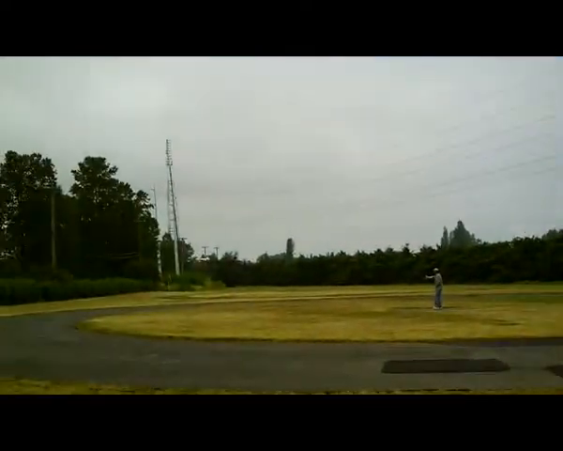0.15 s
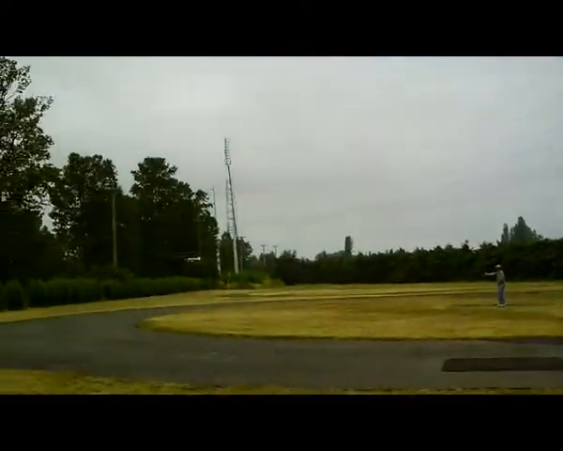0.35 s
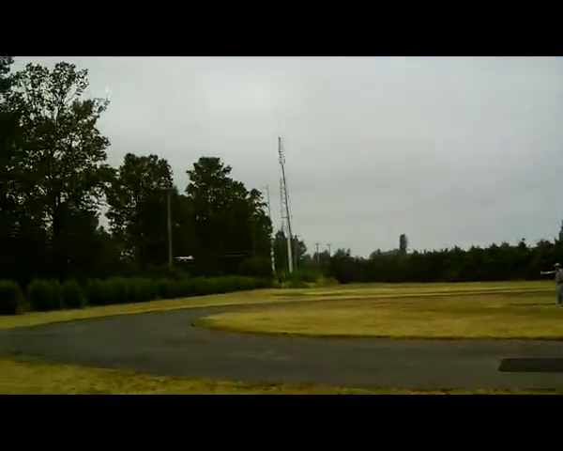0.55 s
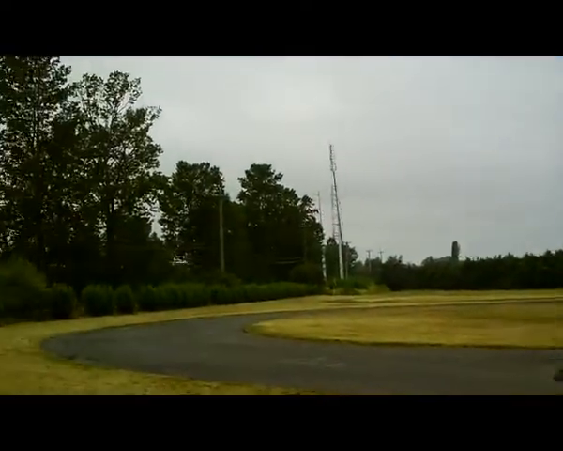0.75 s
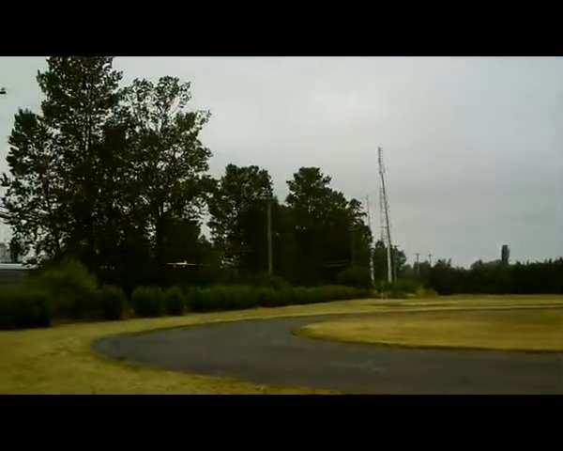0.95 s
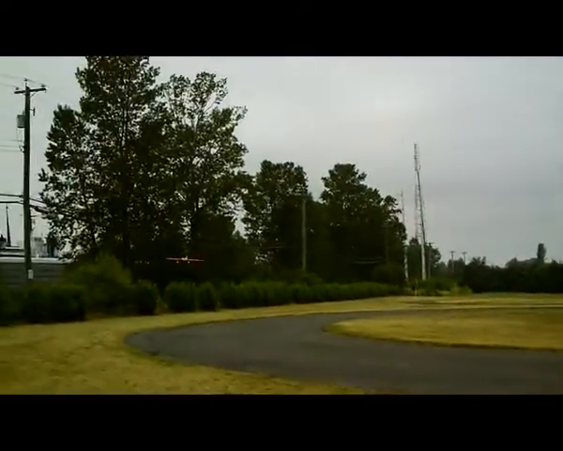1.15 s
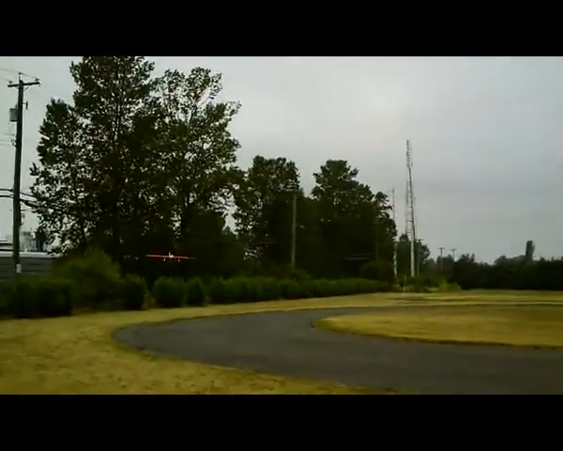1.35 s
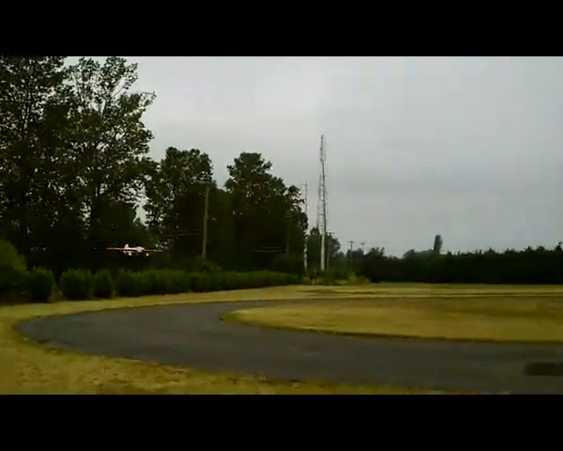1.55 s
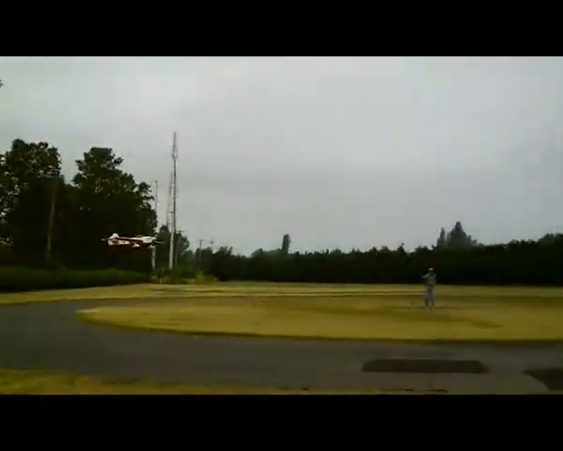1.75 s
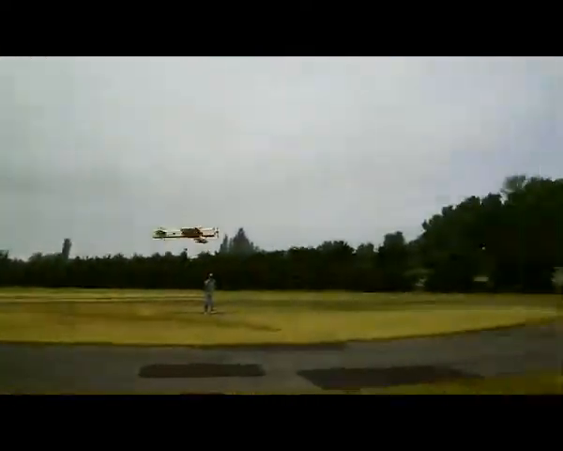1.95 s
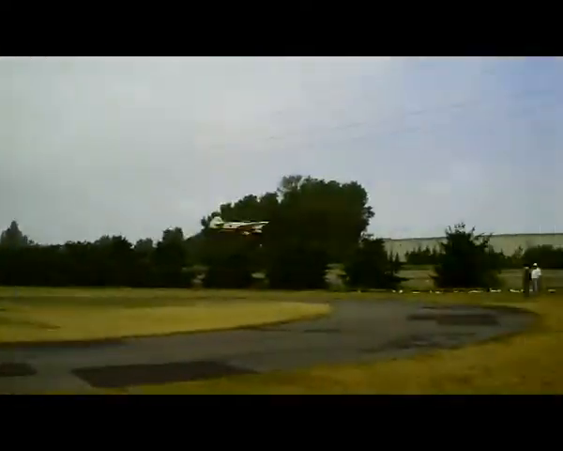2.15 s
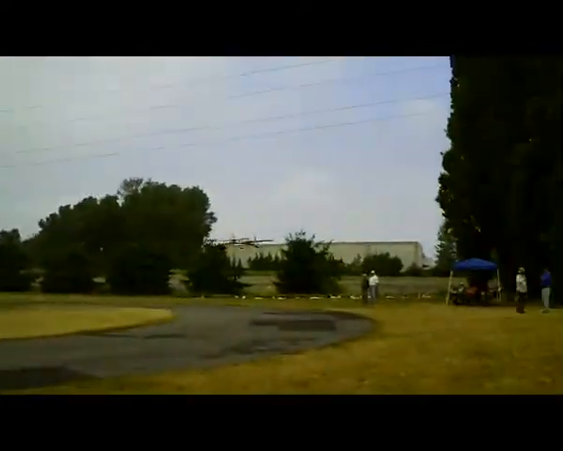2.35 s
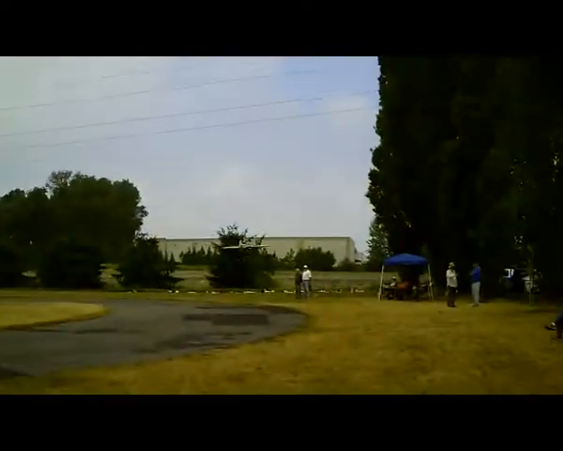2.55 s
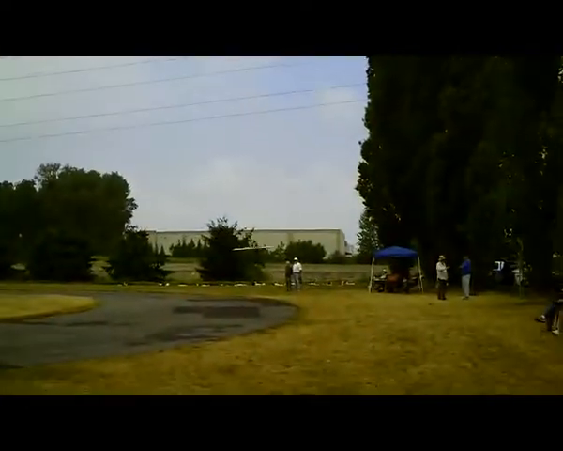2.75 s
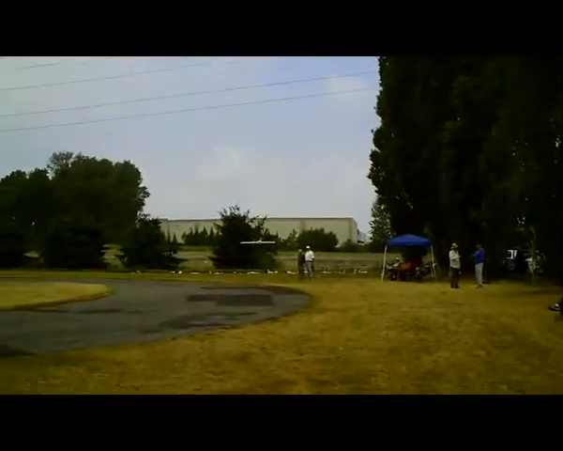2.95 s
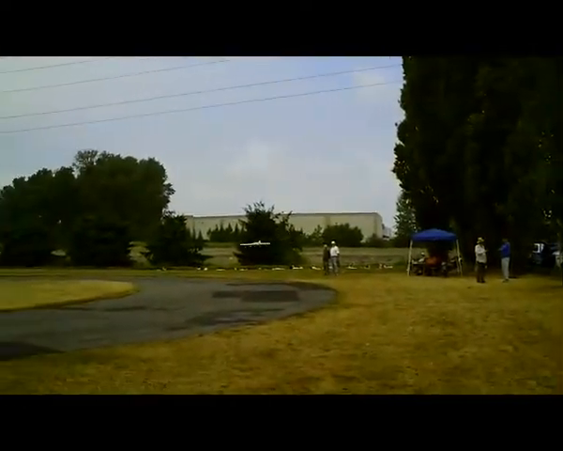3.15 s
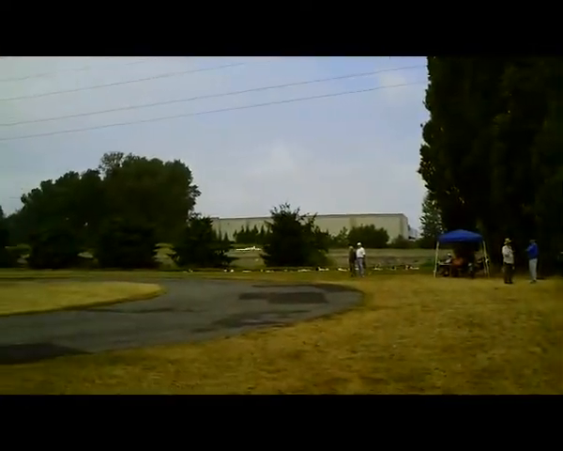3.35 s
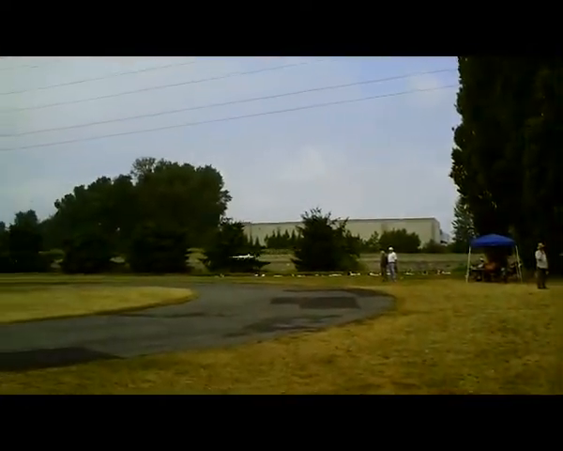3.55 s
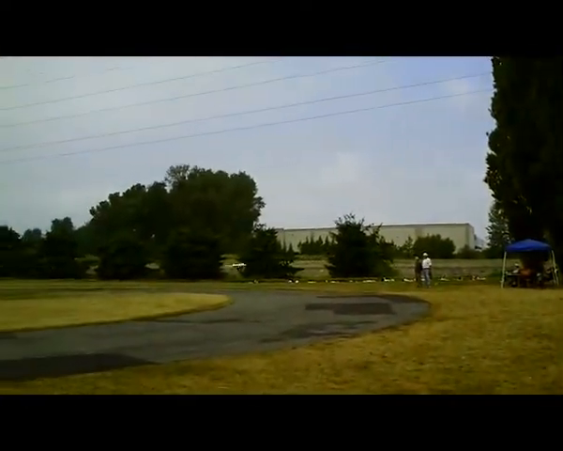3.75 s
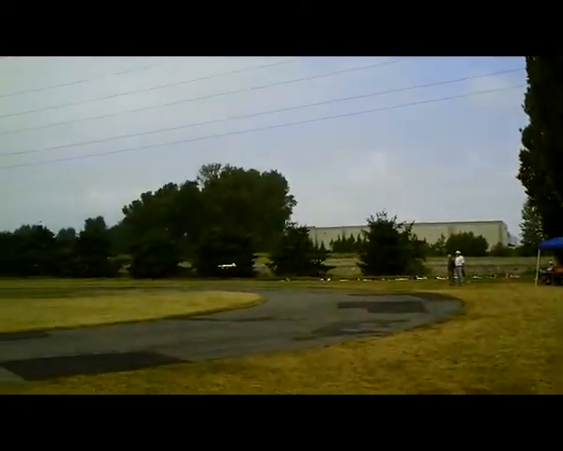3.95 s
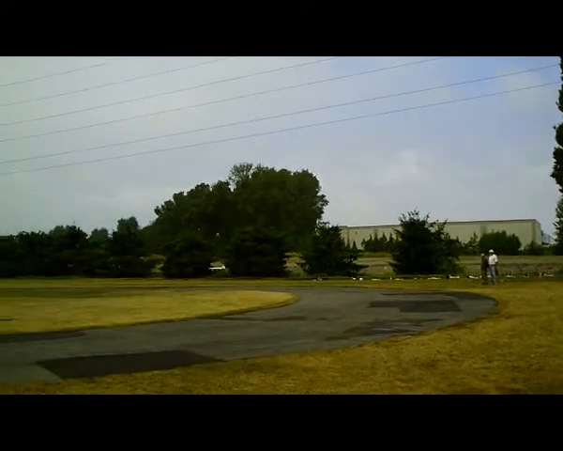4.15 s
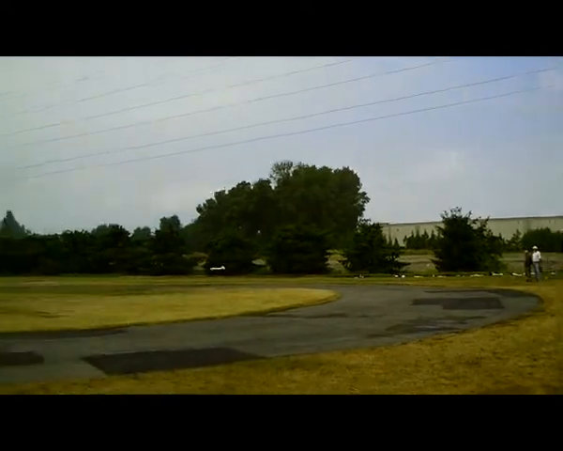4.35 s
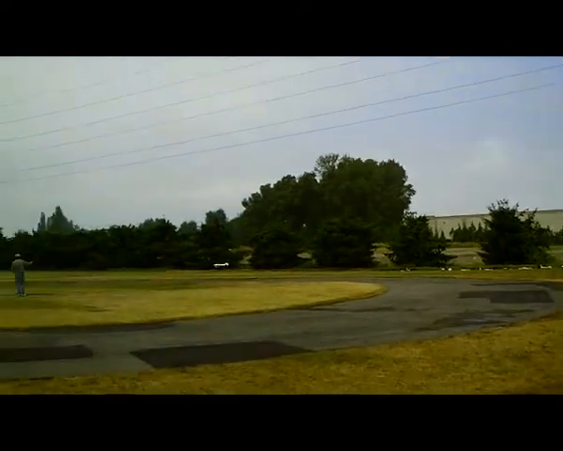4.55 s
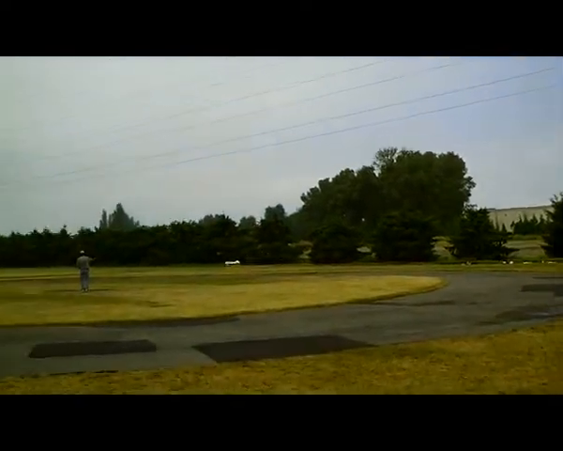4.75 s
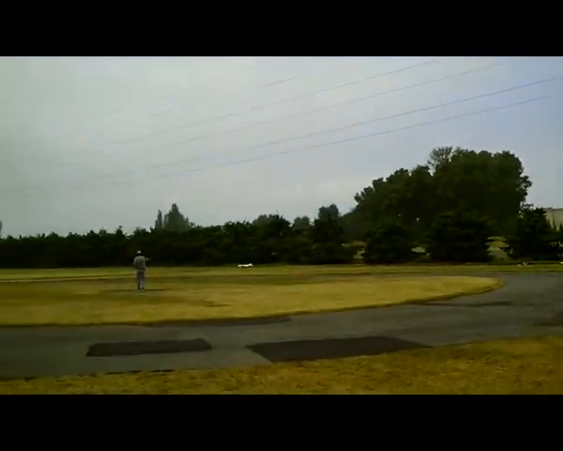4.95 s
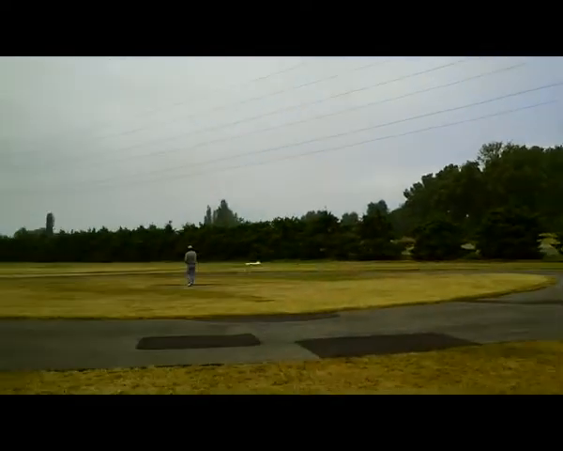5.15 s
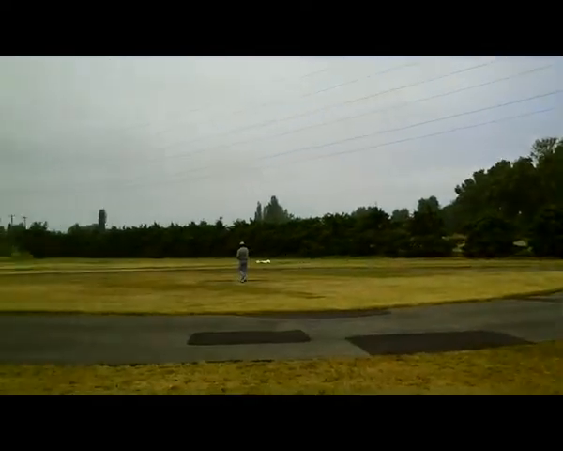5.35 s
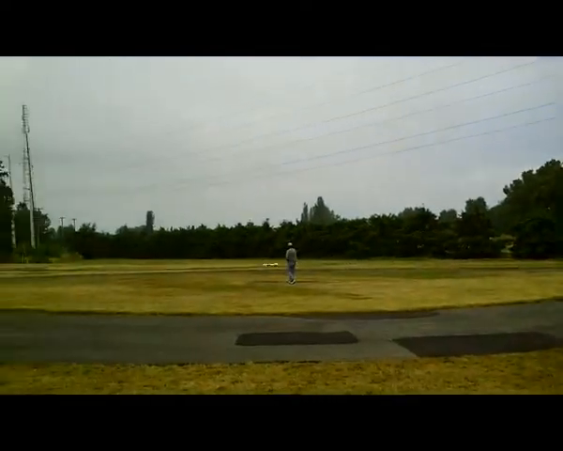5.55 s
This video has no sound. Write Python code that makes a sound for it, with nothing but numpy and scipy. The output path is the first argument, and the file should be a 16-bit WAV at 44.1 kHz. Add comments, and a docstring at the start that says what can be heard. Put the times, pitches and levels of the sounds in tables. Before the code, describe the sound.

A small model plane engine approaches with a raspy, hissing buzz that grows louder. As it passes close by, the pitch drops and the engine throttles back, slowing to a rough putter and then a faint, distant ticking idle. Low wind rumbles on the microphone over an open field, with far traffic murmuring behind. A small bird gives a few thin, high chirps toward the end.

```python
"""A grass field: a control-line model plane flies past, throttles back and sinks to a far, ticking idle. Each
firing of its small glow engine rings the muffler and lets out a puff of hiss. The tree line throws the buzz
back; the ground reflects the crank hum, pops and hiss. Wind rumbles on the microphone, distant traffic murmurs
and a small bird chirps."""
import sys
import numpy as np
from scipy import signal
from scipy.fft import rfft, irfft
from scipy.io import wavfile
from scipy.ndimage import uniform_filter1d

SR = 44100
rng = np.random.default_rng(int(sys.argv[2]) if len(sys.argv) > 2 else 0)


def waveform_to_disk(signal):
    """Save audio, clipped to [-1, 1], as 16-bit WAV at the path in sys.argv[1]."""
    frames = np.transpose(np.atleast_2d(signal))
    scaled = np.clip(frames, -1, 1) * 32767
    samples = np.round(scaled).astype(np.int16)
    wavfile.write(sys.argv[1], SR, samples)


N = 246959
TIME = np.arange(N) / SR
PASS_S, PASS_M, SPEED_M_PER_S = 1.872, 8.59, 25.2  # closest approach


def from_db(db):
    """Decibels to gain."""
    return 10 ** (np.asarray(db) / 20)


def rms_one(x):
    """Scale to unit rms."""
    return x / np.sqrt(np.mean(x ** 2) + 1e-20)


def even(x):
    """Hold rms at 1 over a few firings."""
    power = uniform_filter1d(uniform_filter1d(x ** 2, size=2600), size=2600)
    return x / np.sqrt(np.abs(power) + 1e-12)


def in_time(rows):
    """Columns after t/s, interpolated to every sample."""
    t_s, *columns = np.transpose(rows)
    return [np.interp(TIME, t_s, column) for column in columns]


def drift(rate_hz):
    """Slow random wander, rms 1."""
    step, settle = 40, 2000
    pole = np.exp(-2 * np.pi * rate_hz * step / SR)
    noise = rng.standard_normal(N // step + settle + 2)
    slow = signal.lfilter([1], [1, -2 * pole, pole * pole], noise)[settle:]
    return np.interp(np.arange(N) / step, np.arange(len(slow)), rms_one(slow))


def coloured_noise(spectrum):
    """Noise shaped by rows of f/Hz, level/dB; rms 1."""
    hz, db = np.transpose(spectrum)
    bins_hz = np.maximum(np.fft.rfftfreq(N, 1 / SR), 1)
    gain = from_db(np.interp(np.log(bins_hz), np.log(hz), db, left=-80, right=-80))
    return rms_one(irfft(rfft(rng.standard_normal(N)) * gain, N))


def cut(x, hz, kind, order=2):
    """Butterworth filter."""
    return signal.sosfilt(signal.butter(order, hz, kind, fs=SR, output="sos"), x + 1e-18)


def swell(mid_s, half_s):
    """Gaussian envelope, peak 1."""
    return np.exp(-((TIME - mid_s) / half_s) ** 2)


def gliding_resonance(x, centre_hz, width_hz, skirt_hz):
    """Resonance with a moving centre; steeper beyond skirt_hz on either side."""
    carrier = np.exp(2j * np.pi * np.cumsum(centre_hz) / SR)
    baseband = cut(x / carrier, width_hz / 2, "low", order=1)
    baseband = signal.sosfiltfilt(signal.butter(1, skirt_hz, fs=SR, output="sos"), baseband)
    return (baseband * carrier).real


def field(wind_db=-41.5, gust_db=0.73, traffic_db=-49, whine_hz=7600):
    """Wind on the microphone, steady far traffic, a brief rustle and a faint whine."""
    # noise spectra: f/Hz, level/dB
    wind_spectrum = [(15, 2.5), (28, 1), (55, 3.5), (110, 1), (160, -6.5), (230, -9.5), (330, -28),
                     (600, -85)]
    traffic_spectrum = [(150, -30), (330, -6), (500, -8.3), (640, -2.5), (790, 1.5), (1050, -1.7),
                        (1350, -8.8), (1700, -7.5), (2000, -10.5), (2450, -12.5), (2900, -22.8),
                        (4800, -25), (7300, -29.5), (9800, -42), (10800, -85)]
    wind = from_db(wind_db + gust_db * drift(27)) * coloured_noise(wind_spectrum)
    traffic = from_db(traffic_db) * coloured_noise(traffic_spectrum)
    rustle_band = rms_one(cut(rng.standard_normal(N), [2300, 4000], "band"))
    rustle = from_db(-67) * swell(mid_s=4.3, half_s=0.2) * rustle_band
    whine = from_db(-78) * np.sin(2 * np.pi * np.cumsum(whine_hz + 30 * drift(44)) / SR)
    return wind + traffic + rustle + whine


def bird(warble_hz=120):
    """Thin gliding chirps with a quick warble."""
    # chirps: t/s, length/s, start f/Hz, end f/Hz, level/dB
    chirps = [(3.361, 0.058, 7000, 7500, -57), (3.476, 0.052, 7190, 7746, -60),
              (3.598, 0.044, 7500, 8050, -61), (4.807, 0.045, 7300, 7500, -60),
              (4.92, 0.025, 8100, 7650, -62), (4.998, 0.033, 6340, 6200, -62),
              (5.025, 0.032, 6450, 7000, -56), (5.045, 0.041, 6900, 6440, -59),
              (5.112, 0.016, 7050, 6830, -64), (5.127, 0.028, 5600, 5350, -63),
              (5.18, 0.034, 5500, 5400, -63)]
    song, wobble_hz = np.zeros(N), warble_hz * drift(255)
    for t_s, length_s, start_hz, end_hz, db in chirps:
        along = np.clip((TIME - t_s) / length_s, 0, 1)
        hz = start_hz + (end_hz - start_hz) * along + wobble_hz
        song += from_db(db) * np.sin(np.pi * along) * np.sin(2 * np.pi * np.cumsum(hz) / SR)
    return song


def tree_line(x, first_s=0.044, t60_s=0.95, echo_db=-13):
    """Late, slightly dull echoes scattered by hedges and trees."""
    age_s = np.arange(SR) / SR
    scatter = rng.standard_normal(SR) * (age_s > first_s) * from_db(-60 * age_s / t60_s)
    scatter = cut(scatter, [300, 6000], "band", order=1)
    return from_db(echo_db) * signal.fftconvolve(x, scatter / np.sqrt(np.sum(scatter ** 2)))[:N]


def flight():
    """Straight pass: distance/m and facing (+1 nose-on, 0 abeam, -1 tail-on)."""
    to_go_m = SPEED_M_PER_S * (PASS_S - TIME)
    distance_m = np.hypot(to_go_m, PASS_M)
    return distance_m, to_go_m / distance_m


def over_grass(x, mic_m=1.5, sound_m_per_s=343, grass_cut_hz=740):
    """Add a dull ground reflection; it lags most at the pass, so its notches sweep down and up."""
    # plane above the grass: t/s, height/m
    heights = [(0, 0.93), (.45, 0.58), (.8, 1.42), (1.9, 1.8), (2.6, 1.69), (5.6, 3.6)]
    height_m, = in_time(heights)
    distance_m, _ = flight()
    detour_m = np.hypot(distance_m, height_m + mic_m) - np.hypot(distance_m, height_m - mic_m)
    reflection = cut(x, grass_cut_hz, "low", order=1)
    return x + np.interp(TIME - detour_m / sound_m_per_s, TIME, reflection)


def side_on(x, lag_s):
    """Delay peaking abeam; unequal lags of the resonances smear each firing into a snarl."""
    _, facing = flight()
    return np.interp(TIME - lag_s * (1 - facing ** 2) ** 2, TIME, x)


def carried_db(power):
    """Levels of crank, pop and hiss from distance, facing and engine speed."""
    # per voice: level at the pass/dB, loss per distance doubling/dB, nose-on gain/dB,
    # loss per speed halving/dB
    voices = { "crank": (-45, 9.5, 3, 5), "pop": (-53.5, 13.5, 17.5, 16), "hiss": (-42, 6.5, 2.5, 3), }
    distance_m, facing = flight()
    doublings, halvings = np.log2(distance_m / PASS_M), -np.log2(power)
    return {name: db - far_db * doublings + nose_db * facing - slow_db * halvings
            for name, (db, far_db, nose_db, slow_db) in voices.items()}


def firing_hz(run_down_hz_per_s=9.5):
    """Firing rate: flat out, throttled back at the pass, then running down steadily."""
    # firing rate, Doppler shift included: t/s, f/Hz
    rates = [(0.0, 78.3), (0.07, 78.4), (0.7, 81.9), (1.18, 84.1), (1.53, 83.7), (1.62, 82.8), (1.69, 80.6),
             (1.79, 74.6), (1.9, 69.1), (1.97, 65.7), (2.07, 60.2), (2.2, 52.9), (2.3, 48.3), (2.4, 45.3),
             (2.6, 41.3), (2.8, 38.3), (3.0, 35.7), (3.4, 31.5), (3.8, 28), (4.4, 23.1)]
    rate_hz, = in_time(rates)
    return np.maximum(rate_hz - run_down_hz_per_s * np.maximum(TIME - rates[-1][0], 0), 1)


def cycles(firing_s):
    """Engine cycles, counted from a firing at firing_s."""
    turn = np.cumsum(firing_hz()) / SR
    return turn - np.interp(firing_s, TIME, turn)


def pulses(turn, spread_db):
    """One click of random strength per cycle."""
    at = np.flatnonzero(np.diff(np.floor(turn)) > 0)
    clicks = np.zeros(N)
    clicks[at] = from_db(spread_db * rng.standard_normal(len(at)))
    return clicks


def puffs(turn, decay_s, floor):
    """Gas flow: a burst per cycle, decaying to a steady floor."""
    return floor + np.exp(-(turn % 1) / firing_hz() / decay_s)


def roughen(clicks, flow, rough):
    """Firing pulses plus turbulence carried by the flow."""
    return even(clicks) + rough * even(flow * rng.standard_normal(N))


def voice(x, track, width_hz, skirt_hz, fade_db_per_s=13):
    """One engine resonance; past the end of its track it fades as the plane glides off."""
    db, centre_hz = in_time(track)
    gain = from_db(db - fade_db_per_s * np.maximum(TIME - track[-1][0], 0))
    return gain * even(gliding_resonance(x, centre_hz, width_hz, skirt_hz))


def idle_ticks(decay_s=0.004):
    """A brief spell of bright snaps at idle, one per firing."""
    snaps = pulses(cycles(firing_s=4.394), spread_db=1.2)
    bursts = signal.lfilter([1], [1, -np.exp(-1 / (decay_s * SR))], snaps + 1e-18)
    spell = from_db(-48.5) * swell(mid_s=4.56, half_s=0.38)
    return cut(spell * bursts * rng.standard_normal(N), [4900, 9200], "band", order=6)


def jet_whistle(flow):
    """Breathy whistle in the exhaust jet on the approach."""
    # whistle: t/s, f/Hz, level/dB
    track = [(0, 7000, -72), (.45, 6750, -62), (.62, 6656, -52.5), (.82, 6400, -49), (.93, 6500, -60),
             (1.02, 7250, -53), (1.3, 7250, -51), (1.5, 7300, -62), (1.8, 7300, -100)]
    hz, db = in_time(track)
    breath = flow * rng.standard_normal(N)
    return from_db(db) * even(gliding_resonance(breath, hz, width_hz=330, skirt_hz=1300))


def jet_hiss(flow, db, turns_away_s=3.1, fade_db_per_s=2.5, wander_db=1.5, wander_hz=70):
    """Puffs of hiss with wandering resonances, fading once the exhaust points away."""
    # hiss spectrum: f/Hz, level/dB
    spectrum = [(1650, -38), (2800, 1.5), (3170, 0), (3690, -8), (3990, 1), (4320, -1), (4590, -3),
                (4930, 3.5), (5340, 0), (5780, -4.5), (7320, -0.5), (9590, 0), (11300, -7.5), (13000, 1.5),
                (13500, -43)]
    # resonances rung by the hiss: f/Hz, width/Hz, gain/dB
    modes = [(3705, 260, 0.5), (4280, 370, -2), (6050, 760, 3), (6690, 120, 4), (7320, 810, 3.5),
             (8320, 360, 0.5), (9520, 1050, -5)]
    broadband = coloured_noise(spectrum)
    noise, ringing = rng.standard_normal(N), np.zeros(N)
    for hz, width_hz, mode_db in modes:
        gain = from_db(mode_db + wander_db * drift(2.7))
        ringing += gain * gliding_resonance(noise, hz + wander_hz * drift(1.3), width_hz, 2 * width_hz)
    hiss_db = db + 3 - fade_db_per_s * np.maximum(TIME - turns_away_s, 0)
    hiss = from_db(hiss_db) * even((broadband + 1.5 * rms_one(ringing)) * flow)
    # the hiss loses its top above 10 kHz as it grows faint
    top_gain = from_db(-2.5 * np.maximum(-47 - hiss_db, 0))
    dull = signal.sosfiltfilt(signal.butter(8, 10300, fs=SR, output="sos"), hiss)
    return dull + top_gain * (hiss - dull)


def exhaust_rasp(clicks, rush_turn, power):
    """Two bright resonances rung by clicks and short rushes of gas, noisier off load."""
    # rasp and its hard upper edge: t/s, level/dB, f/Hz
    rasp_track = [(0, -60, 2170), (.45, -55, 2260), (.7, -47, 2320), (.98, -49, 2190), (1.28, -42.5, 2320),
                  (1.58, -46.5, 2090), (1.8, -41, 2330), (1.94, -42, 2260), (2.05, -45.5, 2210),
                  (2.18, -45, 2220), (2.42, -53.5, 2190), (2.57, -52.5, 2200), (2.87, -55.5, 2260),
                  (3.3, -59, 2280), (3.7, -66, 2250), (4.0, -63, 2180), (4.15, -62, 2270),
                  (4.45, -59.5, 2230), (4.8, -71, 2280)]
    edge_track = [(0, -67, 2760), (1.3, -62, 2840), (1.62, -52, 2480), (1.8, -67, 2760), (2.0, -64, 2870),
                  (2.16, -59, 2700), (2.3, -70, 2880), (2.46, -54, 2750), (2.6, -67, 2840)]
    rush = puffs(rush_turn, decay_s=0.01, floor=0.19)
    rasp = voice(roughen(clicks, rush, 0.96 + 2 * (1 - power)), rasp_track, width_hz=460, skirt_hz=400)
    edge = voice(roughen(clicks, rush, 0.55 + 2 * (1 - power)), edge_track, width_hz=140, skirt_hz=260)
    return rasp + edge


def muffler(firings, turn, power):
    """Muffler and airframe resonances rung by firings and turbulence, shifting as the plane passes."""
    # exhaust turbulence: t/s, roughness/1
    roughness = [(0, .17), (1.2, .18), (1.55, .14), (1.75, .15), (1.92, .2), (2.07, .55), (2.3, .36),
                 (2.45, .2), (3.2, .2)]
    # resonances: t/s, level/dB, f/Hz
    boom_track = [(0, -54, 270), (.4, -60, 270), (.65, -52, 250), (1.0, -45, 250), (1.53, -40.5, 246),
                  (1.7, -45.5, 245), (1.9, -59.5, 207), (2.3, -56, 190)]
    hum_track = [(2.2, -73, 290), (2.65, -60.5, 253), (2.95, -55, 297), (3.4, -56.5, 284),
                 (3.8, -57.5, 282), (4.05, -61.5, 268), (4.25, -63, 376), (4.7, -70, 370)]  # departure only
    honk_track = [(0, -49.5, 407), (.58, -51.5, 414), (.76, -44, 420), (1.2, -47, 393), (1.5, -51.5, 373),
                  (1.62, -40, 436), (1.72, -37, 455), (1.84, -40.5, 390), (2.0, -40.5, 390),
                  (2.28, -48.5, 436), (2.45, -52, 396), (2.62, -75, 377)]
    growl_track = [(0, -86, 660), (.4, -47, 745), (.62, -62, 710), (.85, -51, 620), (1.3, -69, 660),
                   (1.55, -50, 630), (1.72, -39.5, 686), (1.85, -45, 680), (1.98, -44, 580),
                   (2.15, -46, 620), (2.35, -51, 670), (2.7, -64, 660)]
    bark_track = [(0, -42, 815), (.4, -44, 830), (.85, -46.5, 823), (1.18, -42, 843), (1.4, -35.5, 798),
                  (1.56, -33.5, 737), (1.66, -35, 797), (1.74, -34.5, 893), (1.8, -36, 808),
                  (1.89, -32.5, 742), (1.98, -40, 723), (2.06, -42.5, 765), (2.2, -42.5, 826),
                  (2.36, -44.5, 760), (2.45, -39.5, 780), (2.53, -44.5, 815), (2.85, -49.5, 805),
                  (3.26, -59, 840)]  # main tone
    ring_track = [(0, -50, 1090), (0.551, -52.5, 1100), (.9, -66, 1040), (1.3, -48, 930), (1.5, -38, 900),
                  (1.72, -47.5, 950), (1.84, -44.5, 1210), (1.98, -40.5, 1023), (2.15, -49, 1040),
                  (2.35, -54.5, 1150), (2.7, -62, 1040)]
    twang_track = [(0, -53.5, 1380), (.42, -48, 1390), (.65, -57, 1420), (1.1, -48, 1410),
                   (1.36, -54, 1520), (1.55, -44, 1590), (1.68, -44, 1640), (1.81, -41, 1410),
                   (1.93, -50, 1390), (2.1, -54, 1460), (2.55, -58, 1410), (3.1, -65, 1390),
                   (3.75, -73, 1390), (3.98, -55.5, 1420), (4.1, -78, 1400)]
    rough, = in_time(roughness)
    off_load = 1 - power
    flow = puffs(turn, decay_s=0.065, floor=0.32)
    boom = voice(roughen(firings, flow, rough), boom_track, width_hz=62, skirt_hz=200)
    hum = voice(roughen(firings, flow, 0.13), hum_track, width_hz=45, skirt_hz=90.5)
    honk = voice(roughen(firings, flow, 2 * rough), honk_track, width_hz=109, skirt_hz=257)
    growl = voice(roughen(firings, flow, rough), growl_track, width_hz=97, skirt_hz=181)
    bark = voice(roughen(firings, flow, rough), bark_track, width_hz=68, skirt_hz=245)
    ring = voice(roughen(firings, flow, 2 * rough + off_load), ring_track, width_hz=194, skirt_hz=282)
    twang = voice(roughen(firings, flow, 2 * (rough + off_load)), twang_track, width_hz=170, skirt_hz=480)
    return (boom + hum + side_on(honk, lag_s=0.0015) + side_on(growl, lag_s=0.00824)
            + side_on(bark, lag_s=0.00492) + side_on(ring, lag_s=0.00348) + side_on(twang, lag_s=0.0065))


def engine(intake_lag_cycles=0.67, rush_lead_cycles=0.5, flutter_db=0.82):
    """Glow engine: firings drive muffler, rasp and jet; the crank hums at twice their rate."""
    rate_hz, turn = firing_hz(), cycles(firing_s=2.4565)
    _, facing = flight()
    power = rate_hz / rate_hz.max()
    db = carried_db(power)
    firings = pulses(turn, spread_db=0.9) * from_db(0.8 * (1 - power) * drift(25))  # uneven off load
    intake = 0.76 * power ** 2 * pulses(turn - intake_lag_cycles, spread_db=2.5)
    buzz = muffler(firings, turn, power)
    crank = from_db(db["crank"]) * np.sqrt(2) * np.cos(4 * np.pi * turn)
    pulse_fronts = cut(firings, [200, 1600], "band", order=1)
    pop = from_db(db["pop"]) * even(cut(pulse_fronts, 2300, "low"))
    rush_turn = turn + rush_lead_cycles * np.clip(-facing, 0, 1)  # leads only from behind
    rasp = exhaust_rasp(firings + intake, rush_turn, power)
    jet_flow = 1 + 2.8 * power * puffs(rush_turn, decay_s=0.005, floor=0)
    jet = jet_hiss(jet_flow, db["hiss"]) + jet_whistle(jet_flow)
    flutter = from_db(flutter_db * drift(24))  # moving air shakes the treble
    return buzz + flutter * rasp + over_grass(crank + pop + flutter * jet)


def scene(trees_m=17):
    """Near mono: the sides differ only by a faint, bright wash. Inside trees_m the direct sound gains on the
    echoes."""
    direct = engine() + idle_ticks() + bird()
    distance_m, _ = flight()
    mid = direct + tree_line(direct * np.minimum(distance_m / trees_m, 1)) + field()
    side = from_db(-22.5) * tree_line(cut(direct, 2700, "high"))
    return np.array([mid + side, mid - side])


def record(dry, cutoff_hz=14000):
    """Steep elliptic low-pass."""
    return signal.sosfilt(signal.ellip(10, 0.1, 80, cutoff_hz, fs=SR, output="sos"), dry)


dry = scene()
out = record(dry)
waveform_to_disk(out)
```